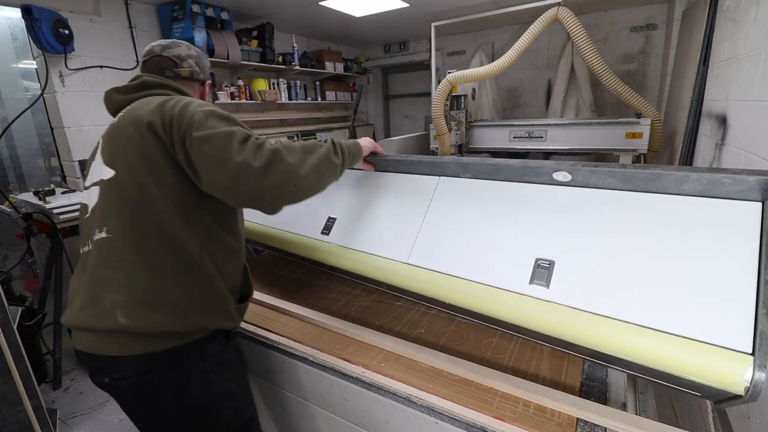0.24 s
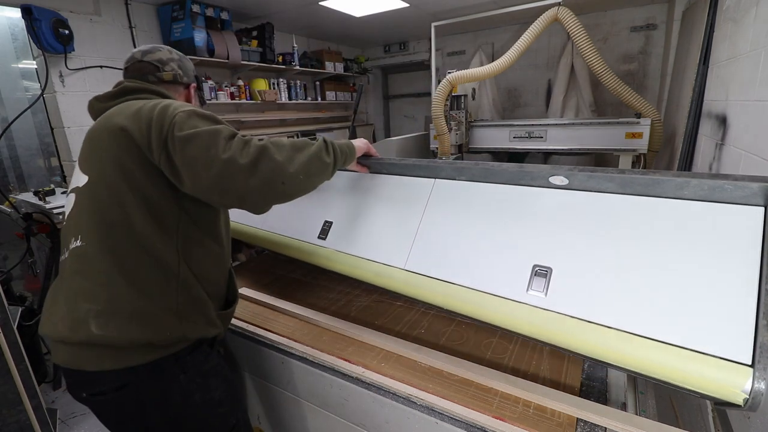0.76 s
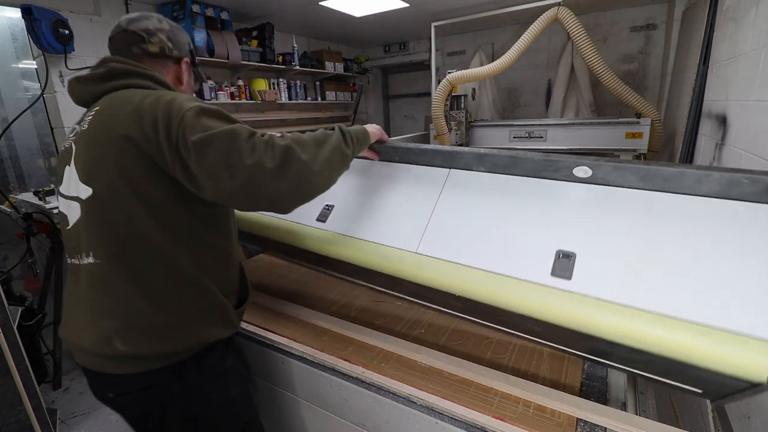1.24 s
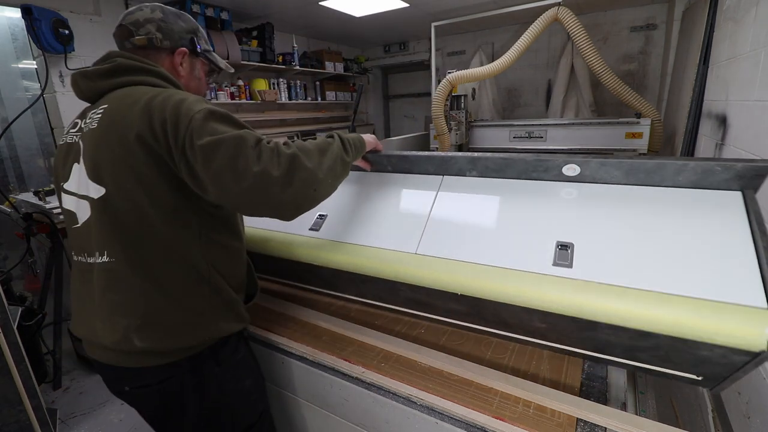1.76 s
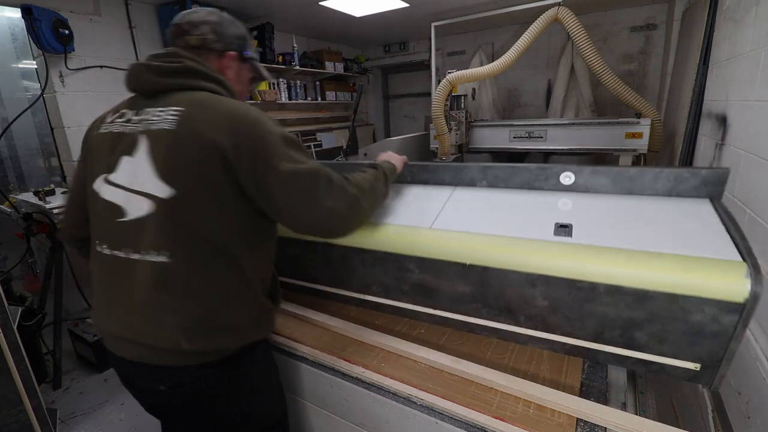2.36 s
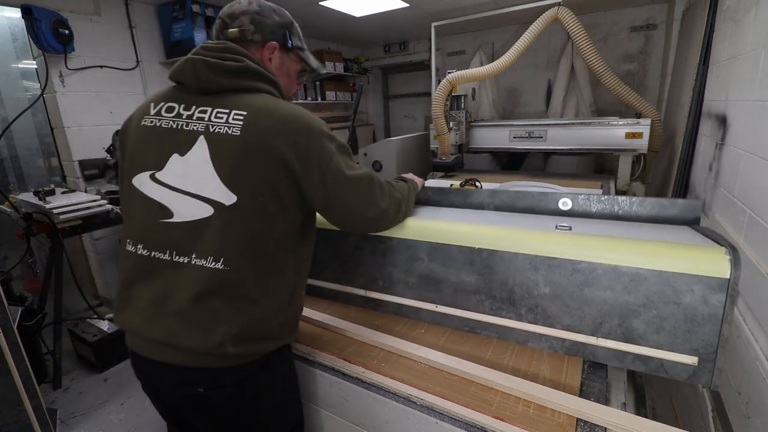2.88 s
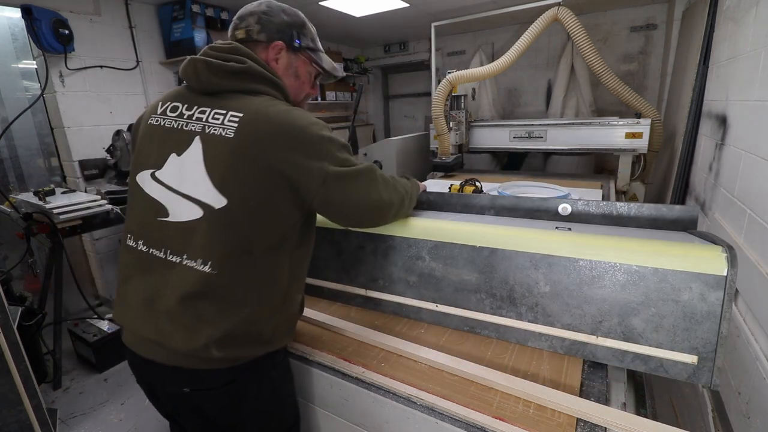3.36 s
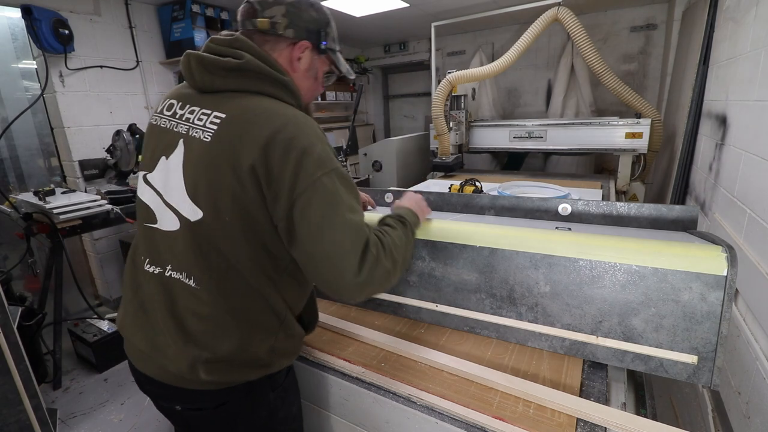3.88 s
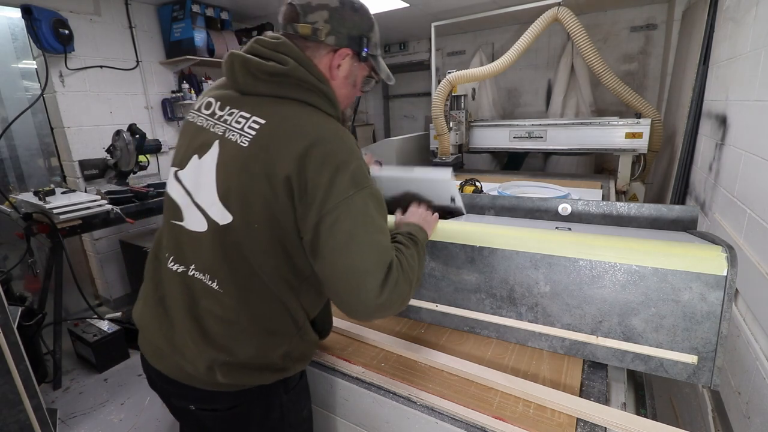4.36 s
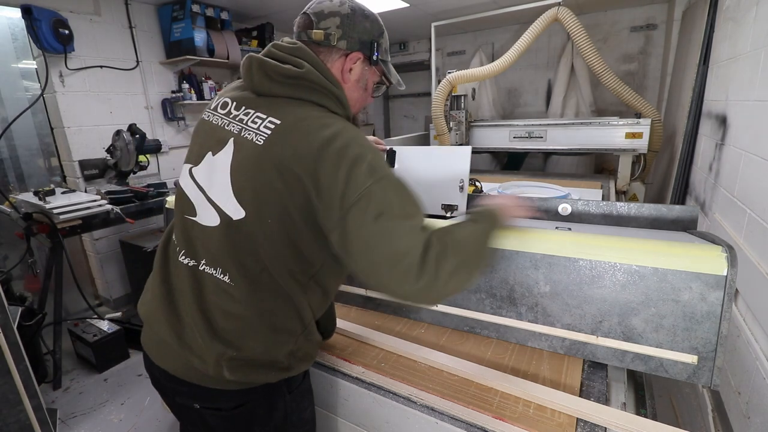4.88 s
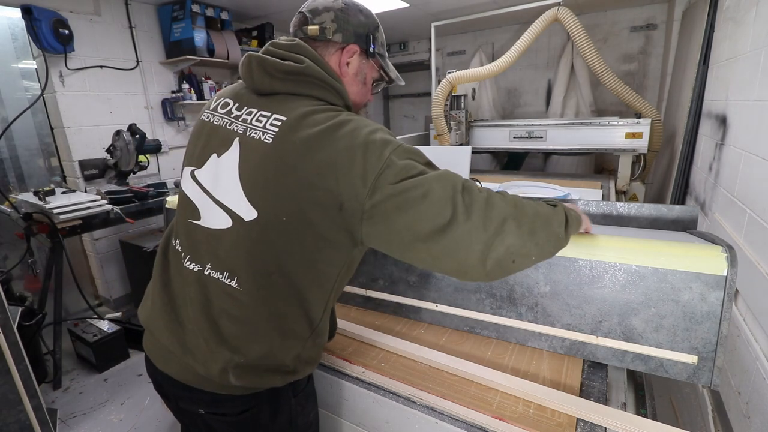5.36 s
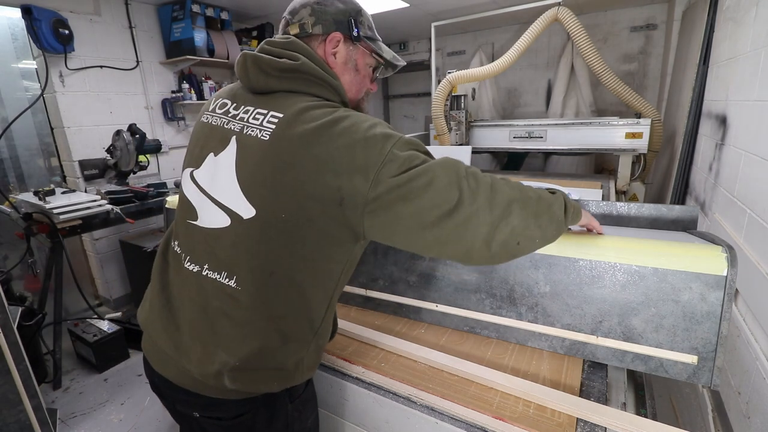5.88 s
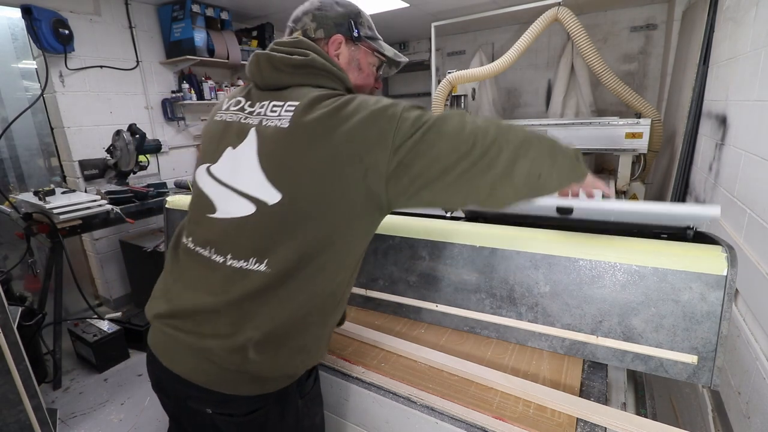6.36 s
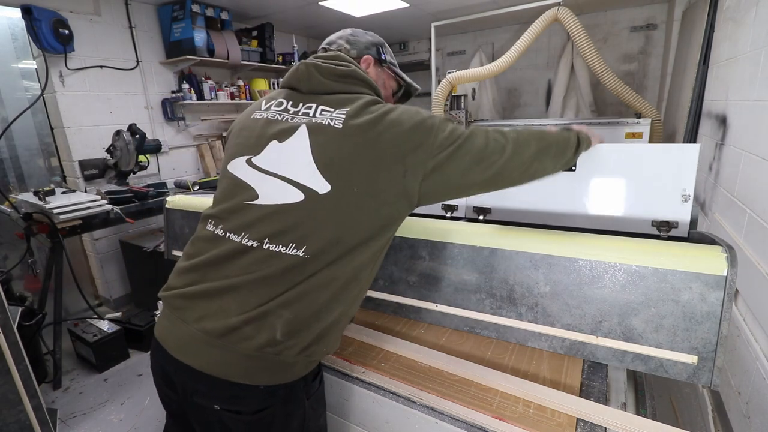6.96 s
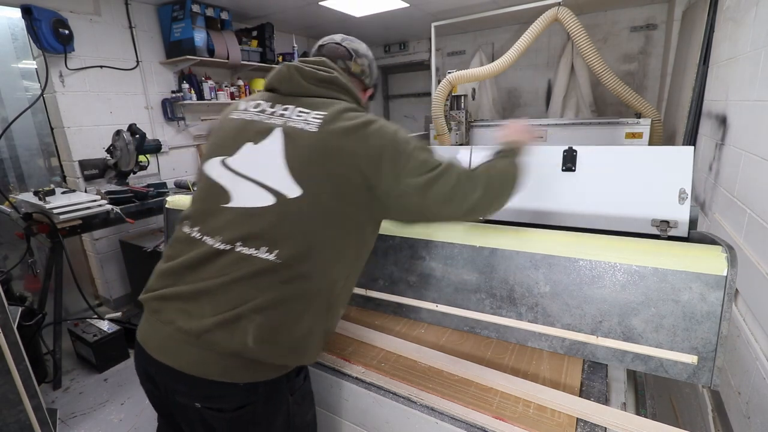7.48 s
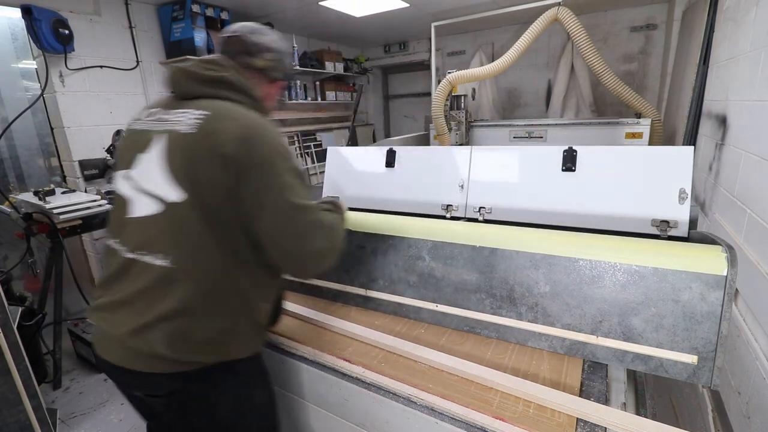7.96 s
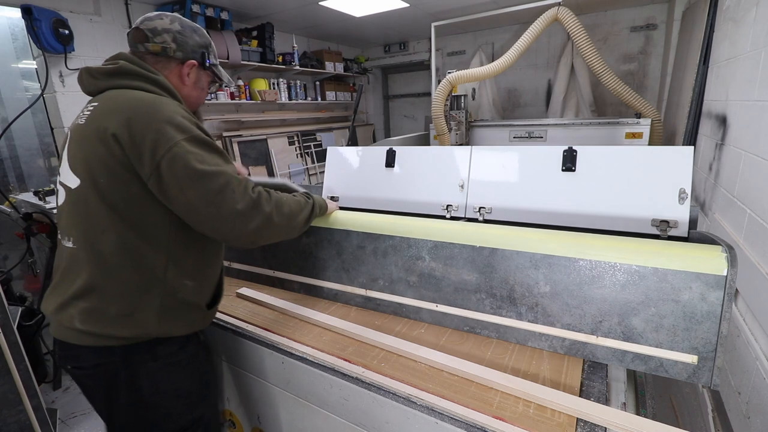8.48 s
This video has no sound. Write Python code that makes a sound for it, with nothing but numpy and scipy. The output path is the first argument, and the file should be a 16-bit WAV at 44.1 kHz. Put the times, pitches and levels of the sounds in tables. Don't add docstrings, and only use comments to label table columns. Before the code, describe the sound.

A person handles a long plywood locker in a workshop. Quiet rubbing and small bumps lead to a heavy hollow thud, then smaller knocks. Spring catches click and snap, door panels knock, and a very loud sharp snap comes near the end, followed by a woody clack and cloth rustle. A close clip-on microphone hears it on the left only, with a short room tail.

```python
import sys
import numpy as np
from scipy import signal
from scipy.io import wavfile

SR = 44100
rng = np.random.default_rng(int(sys.argv[2]) if len(sys.argv) > 2 else 0)


def elevation(decibels):
    levels = np.asarray(decibels, float)
    return 10 ** (levels / 20)


def master_out(mix):
    frames = np.transpose(np.atleast_2d(mix))
    ceiling = np.clip(frames, -1, 1)
    pcm = np.round(ceiling * 32767).astype(np.int16)
    wavfile.write(sys.argv[1], SR, pcm)


N = 384552

# pitch_hz, level_db, t60_s
PANEL_MODES = [(75, -14, 0.4), (109, -17.5, 0.29), (143, -7, 0.32), (188.4, -7.5, 0.12), (231, 1.5, 0.061),
               (290.4, -5.5, 0.11), (341, -10, 0.13), (397.8, -1.5, 0.11), (416.8, -5.5, 0.11),
               (470.6, -2, 0.028), (598, -3.5, 0.035), (682, -5.5, 0.072), (806, -13, 0.096),
               (918, -8.5, 0.017), (1040, -3.5, 0.021)]
# start_s, level_db, hardness_db, favoured_hz
BUMPS = [(0.393, -34, 0, 327), (0.425, -41, -5, 143), (0.488, -47.5, 3, 192), (0.81, -54, -12, 310),
         (0.845, -43, -0.5, 292), (1.159, -51, 10.5, 280), (2.001, -18.5, -10.5, 493),
         (2.025, -28.5, -5, 231), (2.05, -38, -5, 315), (2.109, -34.5, -30, 218), (2.255, -43, -1, 275),
         (2.492, -50, 3.5, 231), (2.77, -51.5, -1, 163), (2.814, -47.5, -1.5, 167), (2.948, -53, 4, 182),
         (3.104, -52.5, 2.5, 368), (3.158, -36, -10, 190), (3.178, -42, -6, 148), (3.2, -36, -2.5, 117),
         (3.223, -47.5, 5, 222), (3.275, -40.5, -13, 177), (3.474, -48.5, -9, 348)]


def band(x, low_hz, high_hz):
    sos = signal.butter(2, [low_hz, min(high_hz, .45 * SR)], "band", fs=SR, output="sos")
    return signal.sosfilt(sos, x)


def rms_one(x):
    return x / np.sqrt(np.mean(x ** 2) + 1e-20)


def drift(rate_hz):
    knots = rng.standard_normal(1000)
    return np.interp(np.arange(N) / SR * rate_hz, np.arange(1000), knots)


def rings(modes):
    hz, db, t60_s = np.transpose(modes)[:, :, None]
    t = np.arange(SR // 2) / SR
    swell = 1 - np.exp(-t * hz / .4)
    signs = (-1.) ** np.arange(len(modes))[:, None]
    return signs * swell * elevation(db - 60 * t / t60_s) * np.sin(2 * np.pi * hz * t)


def still_air():
    air = rng.standard_normal(N)
    rumble = elevation(-70.5) * rms_one(band(air, 25, 63))
    hiss = elevation(-87.5) * rms_one(band(air, 1500, 12000))[::-1]
    return rumble + hiss


def machine():
    # start_s, end_s, level_db
    vents = [
        (0.856, 1.7, -81.5),
        (3.404, 3.963, -80.5),
        (5.88, 6.717, -80),
    ]
    # pitch_hz, width_hz, level_db
    ports = [
        (4660, 290, 6.5),
        (9500, 1400, 12),
        (11500, 470, 0),
    ]
    t, air = np.arange(N) / SR, rng.standard_normal(N)
    gate = np.zeros(N)
    for start_s, end_s, db in vents:
        gate += elevation(db) * np.interp(t, [start_s, start_s + 0.016, end_s - .04, end_s], [0, 1, 1, 0])
    return gate * sum(elevation(db) * rms_one(band(air, hz - w / 2, hz + w / 2)) for hz, w, db in ports)


def squeaks():
    # start_s, end_s, start_hz, end_hz, level_db
    glides = [(.03, .07, 9900, 10500, -84), (.04, .07, 14500, 15500, -82), (.08, .12, 12500, 13300, -84),
              (.12, .28, 13300, 12000, -81), (.26, .44, 15300, 12200, -81), (.49, .51, 13000, 12200, -82),
              (2.49, 2.62, 11200, 14000, -82), (2.65, 2.75, 13300, 12400, -83),
              (2.92, 2.96, 13500, 14800, -82), (3.0, 3.1, 13000, 12300, -84),
              (5.04, 5.12, 12600, 13600, -80), (5.17, 5.27, 11000, 11500, -82),
              (5.2, 5.3, 14300, 13800, -82), (5.4, 5.46, 12500, 12700, -80),
              (5.47, 5.53, 14400, 15400, -78), (5.53, 5.6, 15400, 15200, -77)]
    t, out, waver = np.arange(N) / SR, np.zeros(N), drift(70)
    for start_s, end_s, from_hz, to_hz, db in glides:
        hz = np.interp(t, [start_s, end_s], [from_hz, to_hz]) + 110 * waver
        swell = np.interp(t, [start_s, start_s + 0.0077, end_s - .01, end_s], [0, 1, 1, 0])
        out += elevation(db + 9 + 3 * waver) * swell * np.sin(2 * np.pi * np.cumsum(hz) / SR)
    return out


def swishes():
    # middle_s, half_length_s, level_db
    sleeves = [(2.325, 0.049, -54), (2.815, 0.055, -57.5), (3.537, 0.021, -62), (4.865, 0.012, -59),
               (7.125, 0.064, -52), (7.721, 0.062, -56), (8.004, 0.058, -74)]
    t = np.arange(N) / SR
    gain = sum(elevation(db) * np.exp(-2 * ((t - mid) / half) ** 2) for mid, half, db in sleeves)
    return gain * rms_one(band(rng.standard_normal(N), 1700, 15500))


def contact(t):
    # start_s, level_db
    bustle = [(0, -58), (.7, -59), (1.3, -58.5), (1.65, -60), (1.8, -65), (1.98, -64), (2.3, -56),
              (3.1, -58), (3.4, -62.5), (4.05, -63), (4.35, -65), (4.7, -63.5), (5.4, -56), (5.8, -61),
              (6.4, -57), (6.8, -61.5), (7.55, -60), (8.72, -55)]
    bustle_colour_db = [-3, -7, -10.5, -13.5]
    # middle_s, half_length_s, level_db, grit (0 rumble to 3 rustle)
    slides = [(0.49, 0.06, -47.5, 0.65), (0.848, 0.17, -57.5, 1.14), (0.974, 0.045, -57, .1),
              (1.058, 0.062, -48.5, 0.74), (1.188, 0.058, -59.5, 1.15), (2.318, 0.075, -63, 1.9),
              (3.13, 0.2, -68.5, 0.58), (3.263, 0.036, -59, 0.12), (3.892, 0.1, -48, 0.27),
              (4.124, 0.14, -60.5, 0.31), (4.559, 0.064, -49, 1.03), (4.624, 0.12, -62, .05),
              (4.882, 0.11, -61, 1.53), (5.108, 0.032, -53, 2.23), (5.152, 0.074, -49.5, 0.081),
              (6.01, .06, -64.5, 2.2), (6.132, 0.1, -59.5, 0.51), (6.67, 0.06, -52, 0.6),
              (7.104, 0.09, -47.5, 1.76), (7.158, 0.075, -55.5, 0.72), (7.387, 0.07, -55.5, 1.3),
              (7.708, 0.044, -58, 1.6), (8.121, 0.12, -52, 0.081), (8.31, 0.086, -54.5, 0.65)]
    # middle_s, half_length_s, level_db,
    # grit
    drags = [(.25, 0.25, -75, 1.85), (1.47, 0.56, -80.5, 5), (3.493, 0.046, -58, 2.83),
             (3.713, 0.39, -66, 2.75), (4.68, 0.36, -64.5, 1.76), (5.58, 0.16, -60, 2.07),
             (6.274, 0.22, -64.5, 2.7), (8.055, 0.1, -58.5, 1.88), (8.146, 0.22, -57, 2.27),
             (8.515, 0.27, -63.5, 2.1)]
    grit_fall_db = 11.5
    shudder_db, shudder_peak_s = -29.5, 0.064
    layer = np.arange(4)[:, None]
    gain = elevation(np.interp(t, *np.transpose(bustle)) + np.array(bustle_colour_db)[:, None])
    for mid, half, db, grit in slides + drags:
        stroke = np.exp(-2 * ((t - mid) / half) ** 2)
        gain = gain + elevation(db - grit_fall_db * (layer - grit) ** 2) * stroke
    for s, db, *_ in BUMPS:
        since = np.maximum(t - s, 0) / shudder_peak_s
        gain = gain + elevation(db + shudder_db - 11.3 * layer ** 2) * since * np.exp(1 - since)
    return gain


def handling():
    t = np.arange(N) / SR
    coarse_t = t[::64]
    rumble, rub, scrape, rustle = [elevation(2.5) * np.interp(t, coarse_t, g) for g in contact(coarse_t)]
    grains = rng.standard_normal((3, N)) * elevation(1.3 * drift(60))
    ringing = signal.fftconvolve(grains[0], rings(PANEL_MODES).sum(axis=0))[:N]
    wood = rms_one(ringing) + 9.3 * rms_one(band(grains[0], 90, 1800))
    out = rumble * rms_one(band(band(wood, 110, 900), 120, 430)) * elevation(2.0 * drift(16))
    out += rub * rms_one(band(band(wood, 390, 2100), 300, 2400)) * elevation(3 * drift(45))
    out += scrape * rms_one(band(grains[1], 1300, 5000)) * elevation(1.5 * drift(30))
    out += rustle * rms_one(band(grains[2], 4500, 19000))
    return out


def crowd(points):
    hz, db, t60_s = np.transpose(points)
    centres = np.geomspace(hz[0], hz[-1], num=16)
    noise = rng.standard_normal((2, SR))
    bands = np.array([rms_one(band(noise[k % 2], c / 1.14, c * 1.14)) for k, c in enumerate(centres)])
    level, decay_s = [np.interp(np.log(centres), np.log(hz), v)[:, None] for v in (db, t60_s)]
    t = np.arange(SR // 2) / SR
    swell = 1 - np.exp(-t * centres[:, None] / 1.1)
    return centres, bands, elevation(level - 60 * t / decay_s) * swell


def strike(modes, dense, at_s, centres_hz, levels_db, rise_ms, fall_ms, favoured_hz, favour_db,
           spread_db, first):
    out, bank, mode_hz = np.zeros(N + SR), rings(modes), np.transpose(modes)[0]
    band_hz, bands, dying = crowd(dense)
    log_centres = np.log(centres_hz)
    chance = rng.standard_normal((len(at_s), 3, 4096))
    firm = 1500
    ms = (np.arange(4096) - firm) / SR * 1000
    for s, db, rise, hz, (sizes, signs, luck) in zip(at_s, levels_db, rise_ms, favoured_hz, chance):
        swarm = np.where(ms < 0, 0.59 * np.exp(ms / max(rise, .05)), np.exp(-ms / fall_ms))
        contacts = swarm * signs * sizes ** 2
        contacts /= np.sqrt(np.sum(contacts ** 2))
        contacts[firm] += first
        clear = elevation(np.interp(np.log(mode_hz), log_centres, db) + spread_db * luck[:len(modes)])
        clear *= elevation(favour_db * np.exp(-(np.log(mode_hz / hz) / 0.14) ** 2))
        blurred = elevation(np.interp(np.log(band_hz), log_centres, db))
        skip = int(abs(luck[-1]) * 7000) % (SR // 2)
        body = clear @ bank + blurred @ (bands[:, skip:skip + SR // 2] * dying)
        blow = signal.fftconvolve(contacts, body)
        start = round(s * SR) - firm
        out[start:start + len(blow)] += blow
    return out[:N]


def panels():
    # start_s, level_db, hardness_db, favoured_hz
    doors = [(3.816, -44.5, -5, 143), (3.855, -36.5, -44, 204), (4.475, -57, -13, 208),
             (4.577, -43, 6, 190), (4.989, -21.5, 5.5, 250), (5.026, -26.5, -7, 247),
             (5.085, -33.5, 8.5, 223), (5.305, -49, 4.3, 226.4), (5.466, -51, 7.5, 325),
             (5.742, -67.5, 16, 224), (4.645, -51, -24, 190), (5.86, -45, 0, 227), (6, -44, 12, 221),
             (6.061, -43, 7.5, 225), (6.181, -49, -20, 214), (6.606, -37.5, -3, 453),
             (6.638, -42.5, -8, 294), (6.68, -52.5, -5.5, 307), (6.94, -31, 11.5, 220.5),
             (7.301, -24, 9.5, 440), (7.328, -34, -22, 143), (7.963, -55.5, 7.5, 337),
             (8.047, -32.5, 1, 172)]
    # pitch_hz, level_db, t60_s
    dense_panel = [(182.8, -4.5, 0.1), (535, -14, 0.25), (1320, -15, 0.075), (2780, -9.5, 0.069),
                   (6400, -14.5, 0.016), (15930, -27.5, 0.012)]
    s, body, hardness, favoured_hz = np.transpose(BUMPS + doors)
    thud = body + 1.5 - 10.5 * np.log2(favoured_hz / 147.6)
    boom = thud + np.repeat([-0.5, -11], [len(BUMPS), len(doors)])
    clack = body + hardness - 1.5
    tick = clack - 9.5 - 0.93 * np.maximum(body + 44.5, 0)
    levels_db = np.transpose([boom, thud, body - 7.5, clack, tick])
    return strike(PANEL_MODES, dense_panel, s, [75, 170, 480, 1600, 5000], levels_db, 0 * s + 0.12, 4.6,
                  favoured_hz, favour_db=7.0, spread_db=2.0, first=2.6)


def catches():
    # start_s, snap_db, low_ring_db, run_up_ms, favoured_hz
    snap_events = [(3.8542, -27, -52, 4, 3080), (4.086, -23, -46.5, 4.9, 2420),
                   (4.5332, -34, -52.5, 5.7, 1920), (4.568, -18.5, -45.5, 11.6, 2900),
                   (4.9202, -42, -50, 10, 1690), (6.1484, -27, -45.5, 7.2, 2670),
                   (6.9261, -7, -19, 3.25, 2620), (6.9434, -12.5, -45, 1.5, 2700),
                   (7.0547, -30.5, -51, 2.0, 2640), (7.1446, -32.5, -45, 30, 2610),
                   (7.219, -41.5, -71, 12, 1570), (8.262, -25.5, -39.5, 6.3, 2010)]
    # pitch_hz, level_db, t60_s
    catch_modes = [(927, 8.5, 0.13), (988, -11, 0.11), (1073, 3.5, 0.08), (1690, -21.5, .06),
                   (1882, -4.5, 0.16), (1920, -1, 0.067), (2170, -5, .06), (2280, -7, 0.1), (2640, 5, 0.04),
                   (2700, 5, 0.066), (2840, 2, 0.059), (3114, -18, 0.07), (3410, -12, 0.058),
                   (4330, -7, 0.12), (6200, -6.5, .04), (5790, 11, 0.0261)]
    # pitch_hz, level_db, t60_s
    dense_catch = [(589, -11, 0.048), (930, -8, 0.13), (2570, 1, 0.097), (4410, -1, 0.06), (6400, 1, 0.067),
                   (14540, -13.5, 0.09)]
    s, snap, low, rise_ms, favoured_hz = np.transpose(snap_events)
    top = -15.0 + 1.29 * snap
    levels_db = np.transpose([low + 3, snap - 6, top])
    modes = np.array(catch_modes) + [0, -8.0, 0]
    snaps = strike(modes, dense_catch, s, [1000, 2600, 7500], levels_db, rise_ms, 4.0,
                   favoured_hz, favour_db=3.0, spread_db=2.0, first=0.9)
    return band(snaps, 620, 19000)


def workshop(x):
    t60_low_s, t60_high_s = 0.37, 0.39
    t, noise = np.arange(SR // 2) / SR, rng.standard_normal(SR // 2)
    low = band(noise, 340, 2100) * elevation(-60 * t / t60_low_s)
    high = band(noise, 1000, 9300) * elevation(-60 * t / t60_high_s - 4.5)
    tail = (low + high) * np.clip((t - .006) / 0.011, 0, 1)
    return signal.fftconvolve(x, tail / np.sqrt(np.mean(noise ** 2) * SR * 0.016))[:N]


def scene():
    blows = panels() + catches()
    mono = blows + elevation(-6) * workshop(blows)
    mono += handling() + swishes() + still_air() + machine() + squeaks()
    return np.array([mono, 0 * mono])


def low_pass(x):
    return signal.sosfilt(signal.butter(12, 16480, fs=SR, output="sos"), x)


def record(dry):
    mic_low_hz, top_hz, crosstalk_hz = 100, 15800, 140
    hiss_db, crosstalk_db = -85.3, -40
    left = signal.sosfilt(signal.butter(2, mic_low_hz, "high", fs=SR, output="sos"), dry[0])
    left = .95 * np.tanh(left / .95)
    leak = signal.lfilter(*signal.butter(1, crosstalk_hz, fs=SR), left)
    hiss = rng.standard_normal(N)
    hiss = rms_one(hiss + 1.1 * signal.lfilter(*signal.butter(1, 700.0, fs=SR), hiss))
    both = np.array([left, elevation(hiss_db) * hiss - elevation(crosstalk_db) * leak])
    both = signal.sosfilt(signal.ellip(10, .5, 70, top_hz, fs=SR, output="sos"), both)
    return low_pass(both)


dry = scene()
out = record(dry)
master_out(out)
```